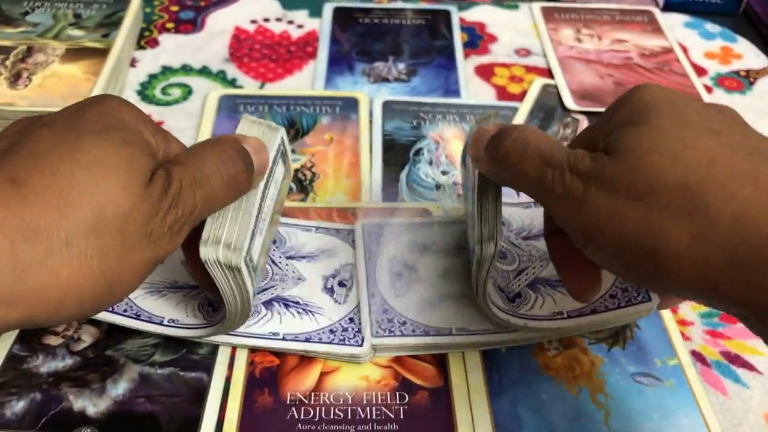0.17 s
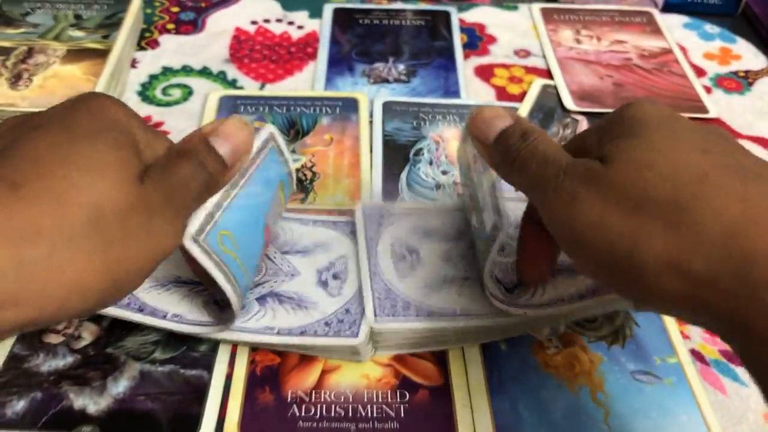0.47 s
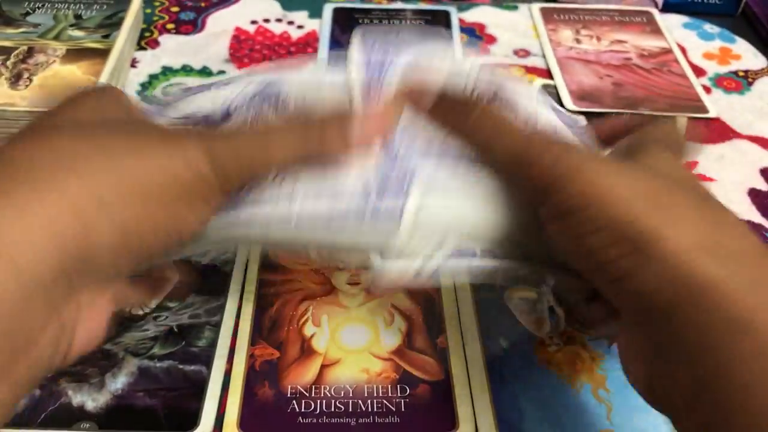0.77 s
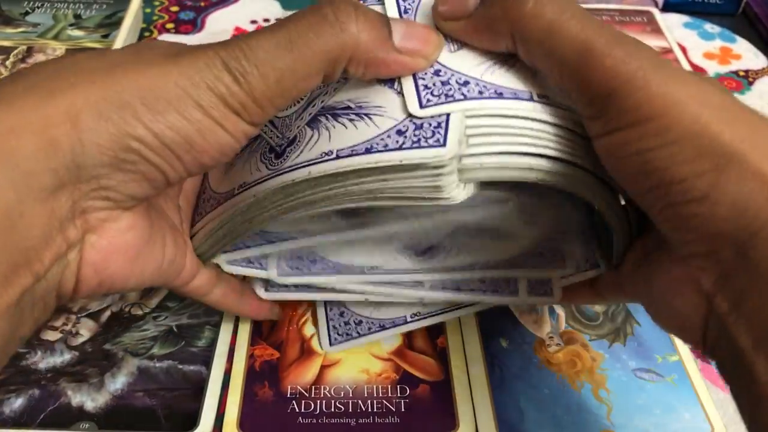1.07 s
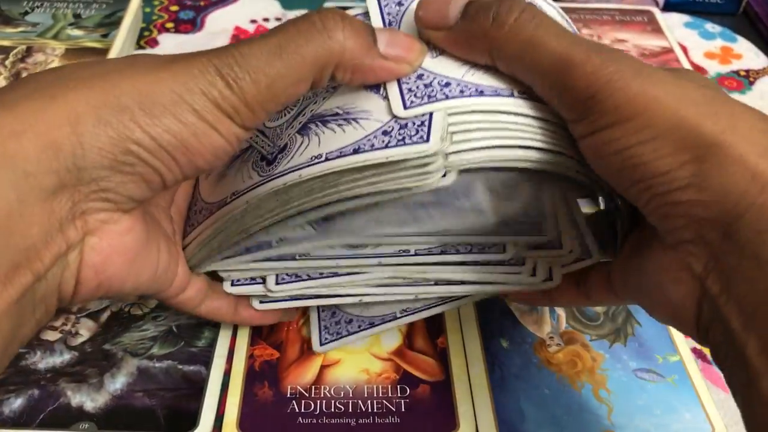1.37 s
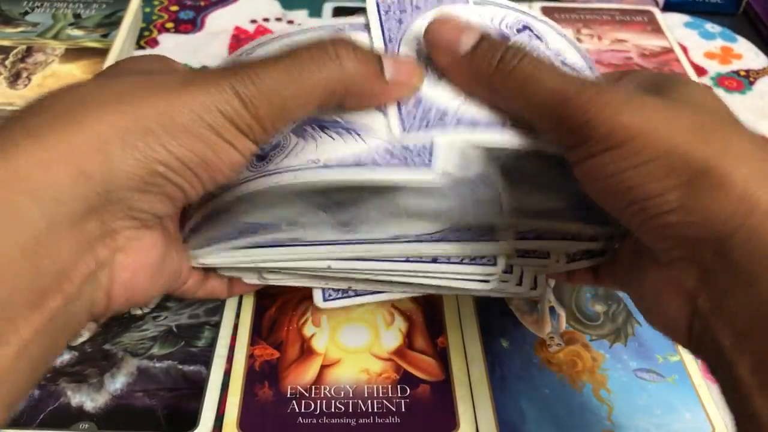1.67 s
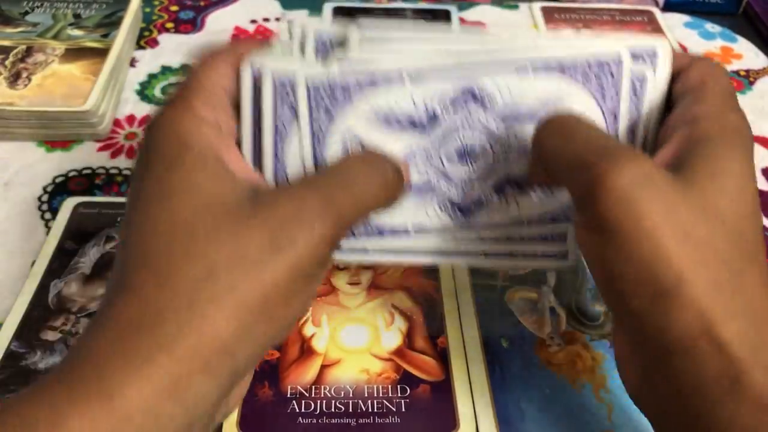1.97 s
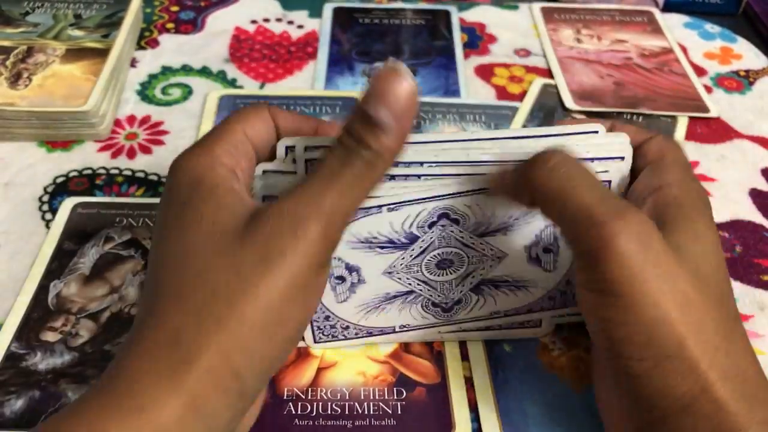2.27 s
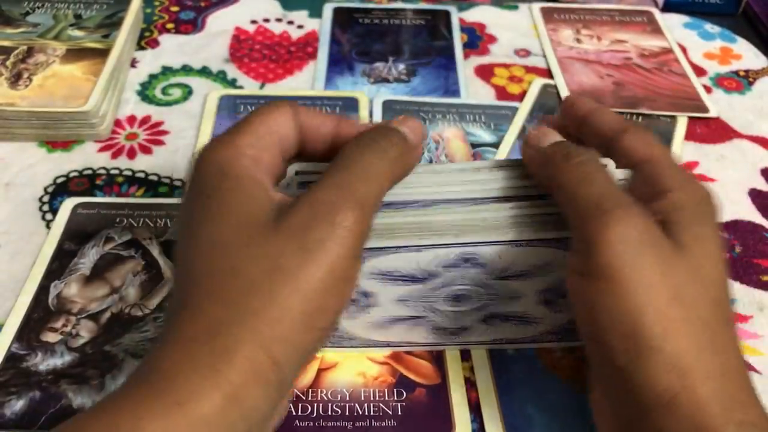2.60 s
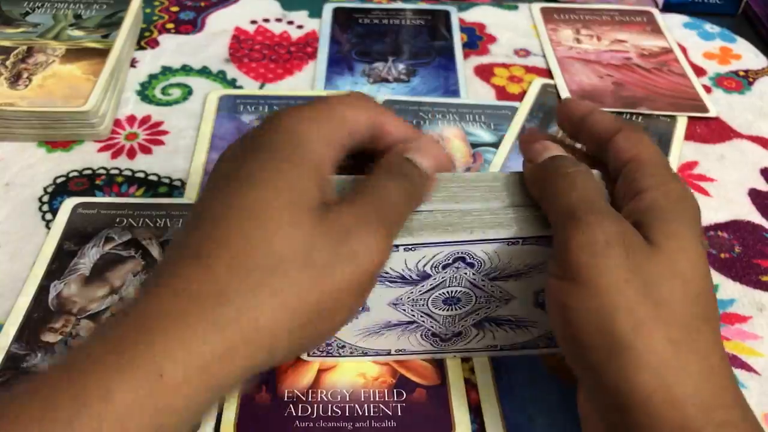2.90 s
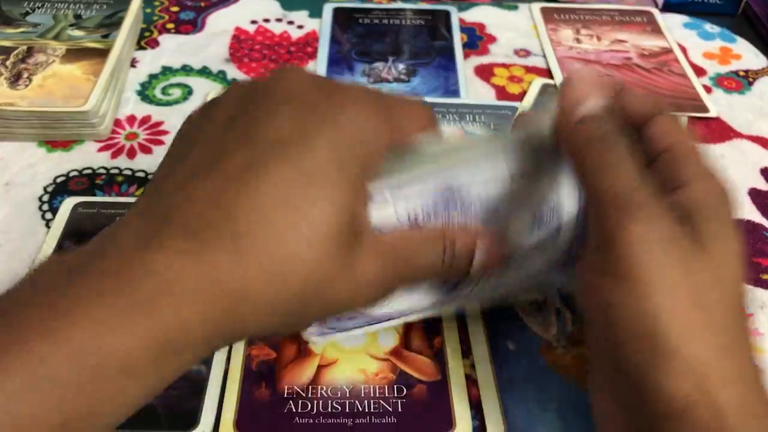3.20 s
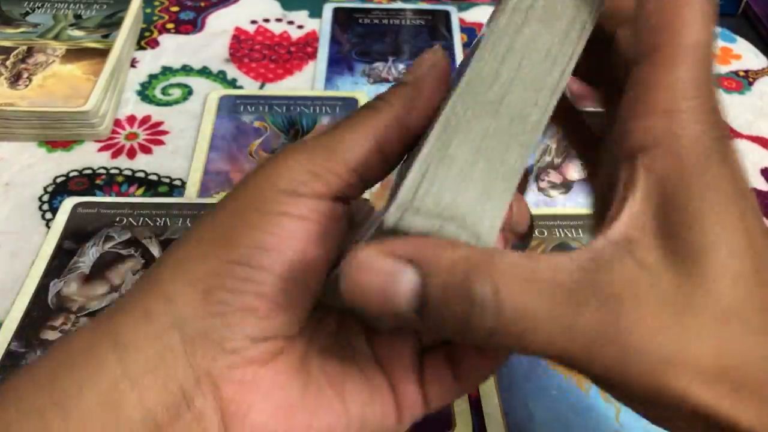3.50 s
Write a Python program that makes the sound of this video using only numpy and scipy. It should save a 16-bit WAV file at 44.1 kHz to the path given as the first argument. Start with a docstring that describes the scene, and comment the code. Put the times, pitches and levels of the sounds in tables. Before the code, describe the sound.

A card deck is riffled, cascaded in a bridge and knocked square on a table.

```python
"""A small room with a cloth-covered table, where a deck of large cards is shuffled by hand.
Two halves riffle off the thumbs, one stiff card cracking; bent into a bridge, they cascade with a hiss.
The deck is knocked on its edge three times to square it, and picked up. Impacts excite damped card
modes and hollow resonances, stick-slip friction makes the hiss, and the room reverberates over a low tone."""
import sys
import numpy as np
from scipy import signal
from scipy.fft import rfft, irfft
from scipy.io import wavfile

SR = 44100
rng = np.random.default_rng(int(sys.argv[2]) if len(sys.argv) > 2 else 0)


def to_wav(s):
    """Save 16-bit WAV."""
    ch = np.atleast_2d(s).T  # columns
    pcm = np.round(np.clip(ch, -1, 1) * 32767)  # PCM
    wavfile.write(sys.argv[1], SR, pcm.astype(np.int16))


N = 160965
TIME = np.arange(N) / SR
EDGE_HZ = 15900  # upper band limit
BODY_HZ, BODY_DB = 1079, -6  # hollow knock of the whole deck
GAP_HZ, GAP_DB = 1747, -12.5  # ring of the air gap under a landing card

# spectrum of a snapping card: f/Hz, relative level/dB
SNAP_SPECTRUM = [(100, -13), (900, -5), (1480, -4.5), (2000, -5.5), (2900, -3), (7200, -11), (9000, -9.5),
                 (10400, -14.5), (13000, -14)]
# spectrum of springing and sliding cards: f/Hz, relative level/dB
SPRING_SPECTRUM = [(250, -1.5), (650, -5.5), (2000, -3), (4500, -0.5), (16000, -7.5)]


def riffle():
    """Impact excitation: cards flick off the thumbs and slap the pile, thickest in the last rush."""
    # cards snapping off the thumbs: t/s, level/dB, tilt/(dB per octave)
    snaps = [(.0494, -29, -0.5), (.0593, -24, -1.5), (.0768, -19, 1.5), (.1049, -22.5, 0), (.12, -20, -2),
             (.1443, -19.5, -2.5), (.2035, -22.5, 0.5), (.2266, -28, -3.5), (.2591, -24.5, -3),
             (.2698, -22.5, 1), (.276, -21.5, -0.5), (.2893, -18.5, -0.5), (.3175, -19, -3),
             (.3233, -12, 5), (.3305, -22, -2.5), (.338, -19.5, 2), (.3456, -25, -5), (.3719, -20.5, -3.5),
             (.3874, -17, -1.5), (.4089, -13, -1), (.4295, -19, -3), (.4425, -12.5, 2.5), (.4868, -12.5, 0),
             (.5097, -13.5, -1), (.5122, -16.5, 1), (.526, -13.5, -2.5), (.5378, -12.5, 4.5),
             (.5408, -8.5, -1), (.5683, -18, 6.5), (.5713, -11, 5), (.5935, -13, 1.5)]
    cards = snaps + stream(0, 0.19, db=-26, count=6) + stream(.49, .605, db=-19.5, count=8)
    return hits(cards, SNAP_SPECTRUM, t60=.008) + rings(cards, GAP_HZ, GAP_DB - 3)


def crack():
    """Stick-slip release: one stiff card breaks free in a run of ever weaker, duller slips."""
    # spectrum of a slip: f/Hz, relative level/dB
    spectrum = [(1800, -15), (2600, -0.5), (5200, -4), (7000, -12), (10300, -17)]
    start_s, interval_s = .1613, .0016
    slips = [(start_s + k * interval_s, -11 - 1.7 * k, 1 - 0.45 * k) for k in range(10)]
    return hits(slips, spectrum, t60=0.0038)


def bridge():
    """Elastic release: the arched deck lets go card by card while the faces slide together."""
    # cards springing out of the bridge: t/s, level/dB, tilt/(dB per octave)
    cascade = [(1.111, -25.5, -0.5), (1.1724, -16, 4.5), (1.2828, -26, 10), (1.4504, -17, 1.5),
               (1.5065, -23.5, -0.5), (1.5432, -21, 1), (1.6087, -19.5, 3.5), (1.685, -27, -3),
               (1.6932, -22, -1), (1.7213, -17, 1), (1.7355, -22, 8), (1.7631, -26.5, 0), (1.776, -22, -3),
               (1.7943, -18, -1), (1.8478, -26, 0), (1.8985, -25, 3.5)]
    # card faces sliding over each other: t/s, level/dB
    sliding = [(0, -54.5), (.7, -56), (.98, -59.5), (1.11, -38.5), (1.4, -47.5), (1.84, -45.5), (1.89, -68)]
    cards = cascade + stream(1.08, 1.85, db=-31.5, count=30)
    hiss = colour(friction(sliding, per_s=500, spread_db=4, smooth=.7), SPRING_SPECTRUM)
    return hits(cards, SPRING_SPECTRUM, t60=0.014) + rings(cards, GAP_HZ, GAP_DB) + hiss


def squaring():
    """Body resonance: packets drop on their edges in clusters, ring the deck and scrape into line."""
    # packets landing edge-first on the table: t/s, level/dB, tilt/(dB per octave)
    knocks = [(1.066, -34.5, -8.5), (2.141, -26, -4), (2.1663, -24, -2), (2.173, -20, -3),
              (2.1803, -16.5, 1.5), (2.1888, -15, -0.5), (2.1965, -18, 3), (2.5315, -20, -3.5),
              (2.5445, -20.5, 1), (2.551, -19.5, 1), (2.5798, -22, 0.5), (2.6574, -25.5, -0.5),
              (2.718, -26.5, -2.5), (2.867, -18.5, .5), (2.8715, -17, 0), (2.8808, -24.5, 1.5),
              (2.894, -18.5, 2)]
    # card edges rubbing as the deck is pushed square: t/s, level/dB
    settling = [(2.5, -54), (2.54, -44), (2.76, -36.5), (2.82, -57.5), (2.88, -33.5), (2.93, -70)]
    # spectrum of the whole deck: f/Hz, relative level/dB
    spectrum = [(100, -28), (480, -14), (800, -2.5), (1100, -2), (1450, -6.5), (2700, -7.5), (15000, -36)]
    scrape = colour(friction(settling, per_s=700, spread_db=3, smooth=.45), spectrum)
    return hits(knocks, spectrum, t60=0.031) + rings(knocks, BODY_HZ, BODY_DB) + scrape


def handling():
    """Friction and light impact: the deck brushes fingers and cloth; fingers tap and loose cards tick."""
    # brushing strokes: peak t/s, length/s, level/dB
    brushes = [(1.035, 0.06, -52), (3.073, 0.028, -55.5)]
    # taps of fingers and loose cards: t/s, level/dB, tilt/(dB per octave)
    touches = [(.7692, -40, 2.5), (.8161, -36, 0.5), (.9594, -41.5, -2), (2.0629, -37.5, 0),
               (2.4483, -26.5, -5), (2.4655, -41.5, -5.5), (3.187, -34, -0.5)]
    swell = sum(amp(db) * np.exp(-(2 * (TIME - s) / length) ** 2) for s, length, db in brushes)
    swishes = colour(swell * rng.standard_normal(N), SPRING_SPECTRUM)
    ticks = hits(stream(1.7, 2.45, db=-42, count=8), SNAP_SPECTRUM, t60=0.0045)
    taps = hits(touches, SNAP_SPECTRUM, t60=0.0047) + rings(touches, GAP_HZ, GAP_DB)
    return swishes + ticks + taps


def air_puffs():
    """Air displacement: a packet falling flat squeezes out a soft, low puff."""
    # puffs under falling packets: t/s, level/dB
    puffs = [(.06, -27), (.14, -27.5), (.273, -26.5), (.318, -25), (.566, -16), (.597, -31), (1.691, -28),
             (1.723, -37), (1.796, -29.5), (2.174, -28)]
    # spectrum of a puff: f/Hz, relative level/dB
    spectrum = [(80, -0.5), (350, 7), (600, -7), (2000, -42)]
    return hits([(s, db, 0) for s, db in puffs], spectrum, t60=0.053)


def hits(rows, spectrum, t60, size=2048):
    """Modal damping: a hit shakes dense modes, the treble dies first (t60 at 1 kHz), a flutter lingers."""
    rise_s, damping_exponent, vary_db = 0.00032, 0.19, 2.5
    out, t = np.zeros(N), np.arange(size) / SR
    attack = 1 - np.exp(-t / rise_s)
    flutter = amp(-18) * fade(t, t60=.03)
    for s, db, tilt in rows:
        hz, bands, share = split(rng.standard_normal(size))
        decay = fade(t, t60 * (hz / 1000) ** -damping_exponent)
        bands = unit(bands * attack * (decay + flutter))
        band_db = tilt * np.log2(np.maximum(hz, BODY_HZ)) + vary_db * rng.standard_normal(hz.shape)
        bands *= np.sqrt(share) * amp(band_db)
        add(out, s, sized(colour(bands.sum(0), spectrum), db))
    return out


def rings(rows, hz, ring_db):
    """Damped resonance: a hollow ring swells after each hit at its own pitch; dull landings ring most."""
    out, t = np.zeros(N), TIME[:SR // 10]
    for s, db, tilt in rows:
        pitch = hz * (1 + .12 * rng.standard_normal())
        ring = np.sin(2 * np.pi * pitch * t) * np.sqrt(t) * fade(t, t60=.02)
        add(out, s, sized(ring, db + ring_db - tilt))
    return out


def friction(curve, per_s, spread_db, smooth):
    """Stick-slip friction: tiny uneven slips over a smooth hiss follow a curve of t/s, level/dB."""
    slips = (rng.random(N) < per_s / SR) * amp(spread_db * np.minimum(rng.exponential(1, N), 4))
    bursts = signal.oaconvolve(slips, fade(TIME[:SR // 10], t60=.004))[:N]
    rough = unit(bursts * rng.standard_normal(N))
    gain = amp(np.interp(TIME, *np.transpose(curve)))
    in_contact = (TIME >= curve[0][0]) & (TIME <= curve[-1][0])
    return unit(rough + smooth * rng.standard_normal(N)) * gain * in_contact


def stream(start, end, db, count):
    """Timing jitter: weaker, duller cards fall unevenly, as rows of t/s, level/dB, tilt/(dB per octave)."""
    return [(start + (end - start) * (k + rng.random()) / count,
             db + 2 * rng.standard_normal(),
             rng.standard_normal() - 1) for k in range(count)]


def room(x, wet_db):
    """Reverberation: diffuse reflections die at each band's own rate, beside one low room mode."""
    # reverberation time: f/Hz, T60/s
    decay_times = [(150, 0.38), (2500, 0.28), (12000, 0.17)]
    mode_hz, mode_t60, mode_db = 150.2, 0.69, -19.5
    t = TIME[:SR // 2]
    hz, bands, _ = split(rng.standard_normal(len(t)))
    build_up = 1 - np.exp(-(t / 0.003) ** 2)
    diffuse = (bands * fade(t, read(decay_times, hz))).sum(0) * build_up
    mode = np.sin(2 * np.pi * mode_hz * t) * fade(t, mode_t60)
    tail = unit(diffuse) + amp(mode_db) * unit(mode)
    return x + amp(wet_db) * signal.fftconvolve(x, tail / np.linalg.norm(tail))[:N]


def room_tone():
    """Stationary noise: a faint, steady rumble fills the room."""
    # spectrum of the room tone: f/Hz, relative level/dB
    spectrum = [(20, -42), (50, 5), (110, -13), (165, -6), (600, -23), (2500, -28), (16000, -41)]
    gain = amp(read(spectrum, np.fft.rfftfreq(N, 1 / SR)))
    return amp(-56.5) * unit(irfft(rfft(rng.standard_normal(N)) * gain, N))


def amp(db):
    """Amplitude ratio of a level in decibels."""
    return 10 ** (np.asarray(db) / 20)


def unit(x):
    """Normalisation to rms 1."""
    return x / np.sqrt(np.mean(x ** 2, -1, keepdims=True) + 1e-20)


def fade(t, t60):
    """Exponential decay, 60 dB in t60 seconds."""
    return np.exp(-np.log(1000) * t / t60)


def read(points, hz):
    """Interpolation on a log-frequency axis."""
    f, value = np.transpose(points)
    return np.interp(np.log(hz + 1), np.log(f + 1), value)


def add(mix, s, sound):
    """Superposition of a sound on the mix, starting at s seconds."""
    part = mix[round(s * SR):][:len(sound)]
    part += sound[:len(part)]


def colour(x, spectrum, size=2048):
    """Minimum-phase filtering with the given spectrum and a response of unit energy."""
    log_gain = np.log(amp(read(spectrum, abs(np.fft.fftfreq(size, 1 / SR)))))
    taps = np.fft.ifft(np.exp(np.conj(signal.hilbert(log_gain)))).real
    return signal.oaconvolve(x, taps / np.linalg.norm(taps))[:N]


def split(x, count=9):
    """Filter bank: returns centres, overlapping bands and each band's share of the bandwidth."""
    centres = np.geomspace(150, EDGE_HZ, count)
    hz = np.fft.rfftfreq(len(x), 1 / SR)
    weights = np.array([np.interp(np.log(hz + 1), np.log(centres), row) for row in np.eye(count)])
    return centres[:, None], irfft(rfft(x) * weights, len(x)), weights.mean(1, keepdims=True)


def sized(x, db, span_s=.0015):
    """Energy equivalence: a hit gets the energy of level db held for span_s."""
    return amp(db) * np.sqrt(span_s * SR) * x / np.linalg.norm(x)


def scene():
    """Superposition of the shuffle, the drier crack and knocks, and the room tone, in one channel."""
    shuffle = room(riffle() + bridge() + handling() + air_puffs(), wet_db=-11.5)
    accents = room(crack() + squaring(), wet_db=-15.0)
    return (shuffle + accents + room_tone())[None]


def record(dry):
    """Band limiting: a 40 Hz low cut, then a steep low-pass at the upper band limit."""
    low_cut = signal.butter(3, 40, "high", fs=SR, output="sos")
    low_pass = signal.firwin(401, EDGE_HZ, window="blackman", fs=SR)
    return signal.oaconvolve(signal.sosfilt(low_cut, dry), low_pass[None], "same")


dry = scene()
out = record(dry)
to_wav(out)
```